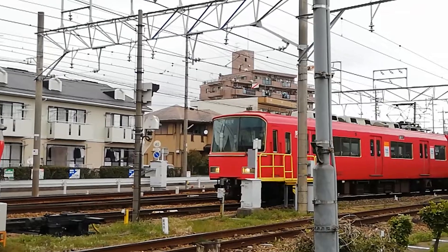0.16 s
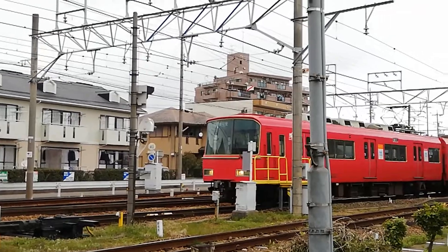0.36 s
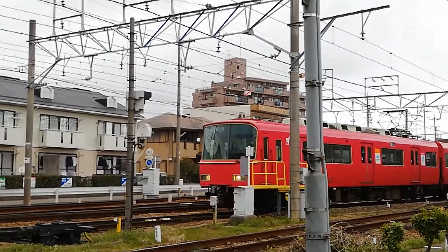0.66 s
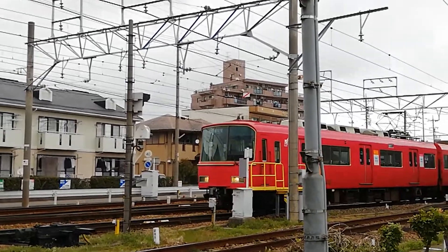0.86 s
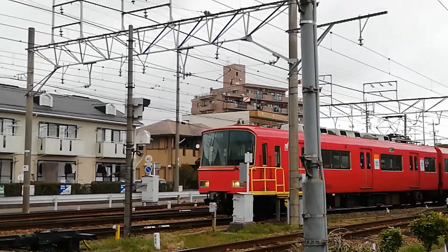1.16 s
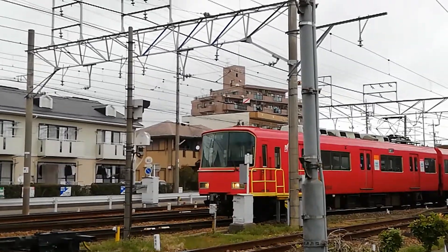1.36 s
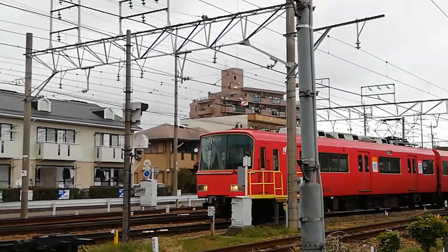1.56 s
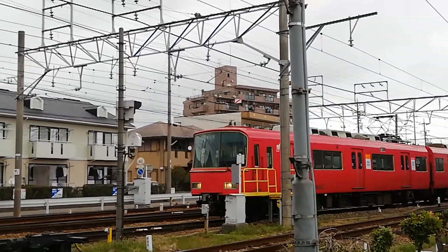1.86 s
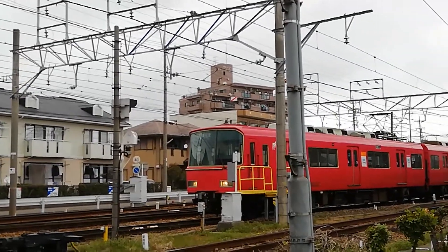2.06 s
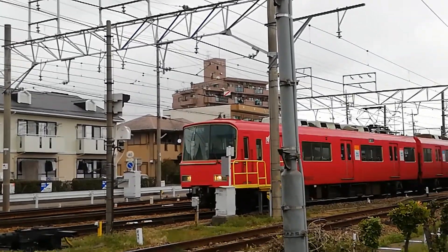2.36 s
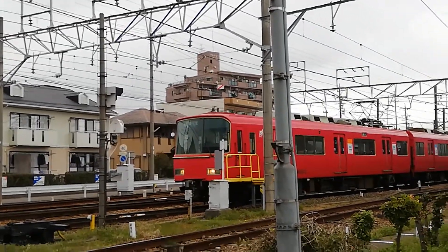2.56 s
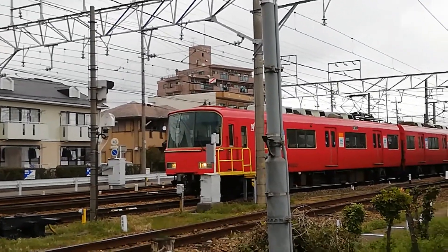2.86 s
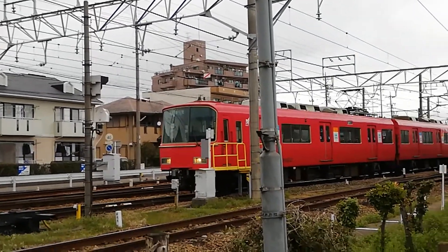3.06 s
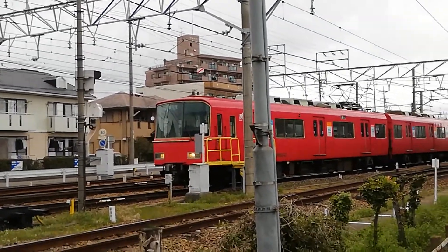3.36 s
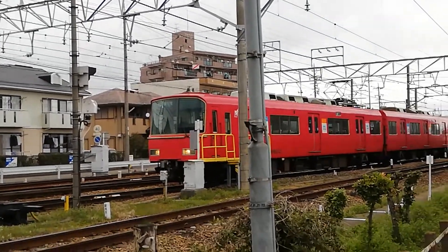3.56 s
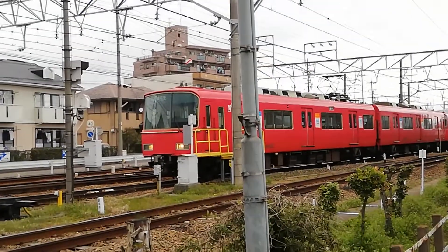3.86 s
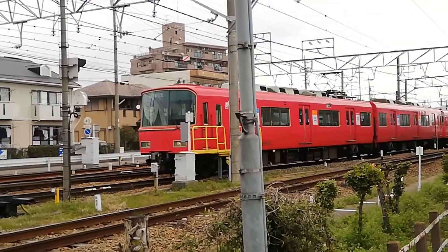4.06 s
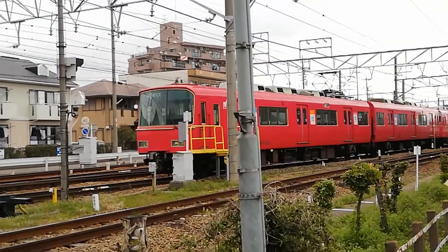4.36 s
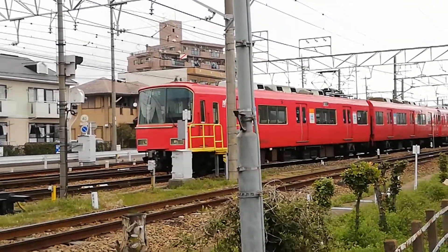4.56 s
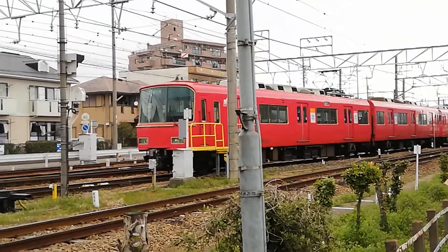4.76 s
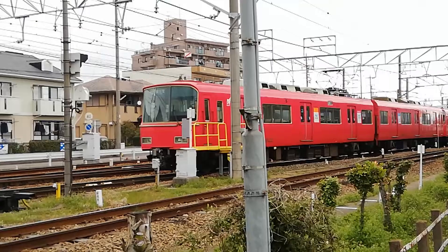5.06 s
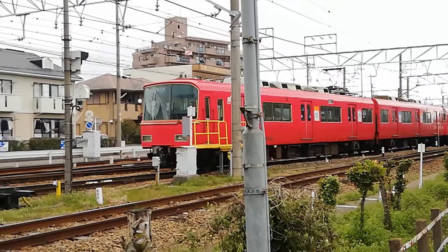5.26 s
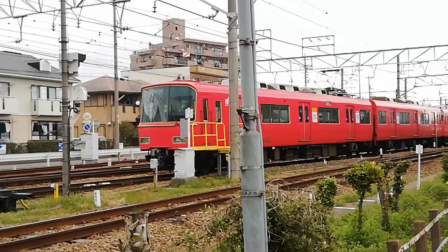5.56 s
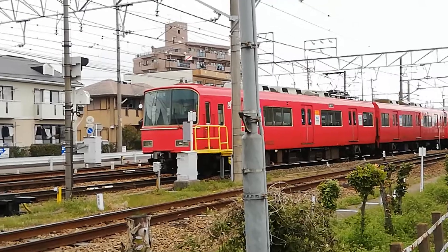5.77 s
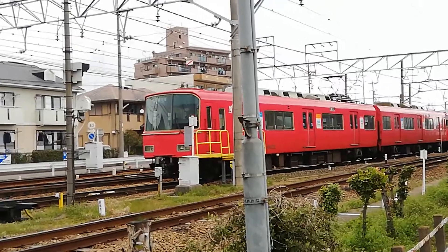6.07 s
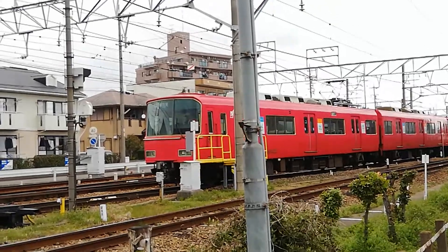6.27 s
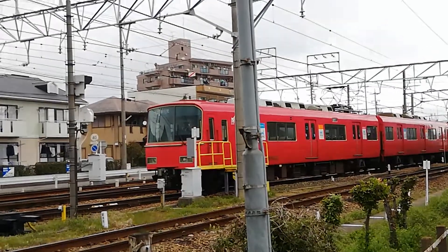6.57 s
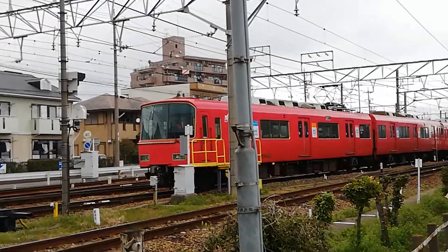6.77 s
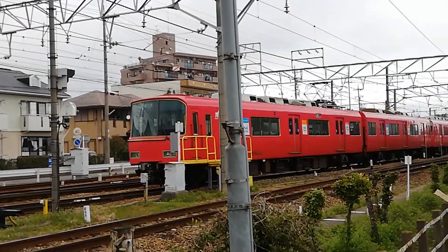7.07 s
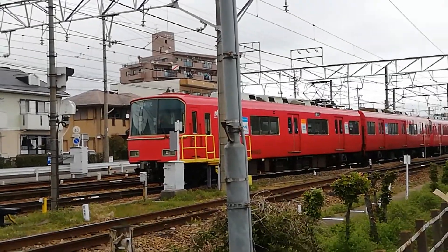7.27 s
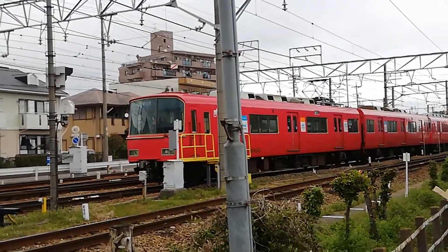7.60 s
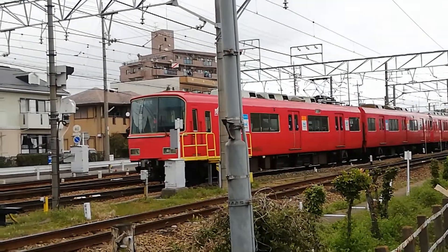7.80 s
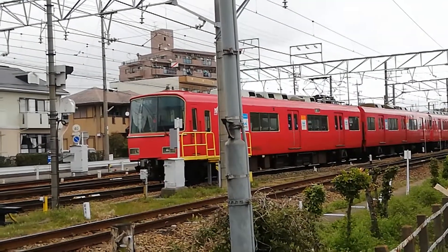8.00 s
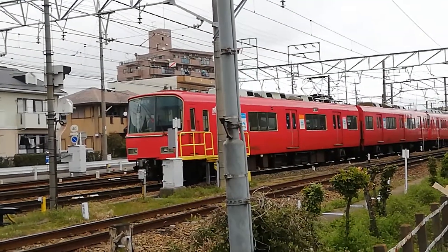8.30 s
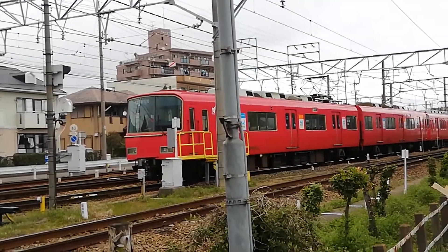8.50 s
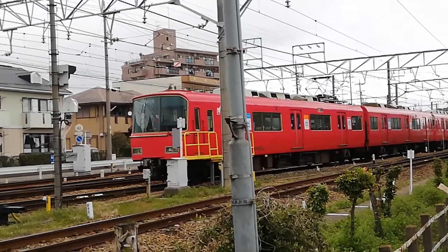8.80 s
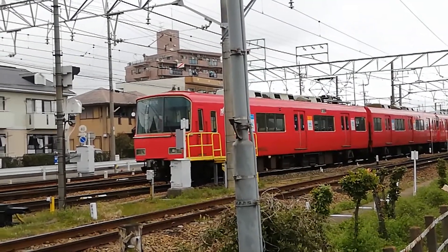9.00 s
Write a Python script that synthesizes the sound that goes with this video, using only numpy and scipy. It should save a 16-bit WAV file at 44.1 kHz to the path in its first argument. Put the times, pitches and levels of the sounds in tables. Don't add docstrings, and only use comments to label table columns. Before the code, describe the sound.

A braking electric train squeals and groans to a stop, releases a sharp rush of air, then its compressor chugs softly as gusts calm.

```python
import sys
import numpy as np
from scipy import signal
from scipy.fft import rfft, irfft, next_fast_len
from scipy.io import wavfile
from scipy.ndimage import uniform_filter1d

SR = 44100
rng = np.random.default_rng(int(sys.argv[2]) if len(sys.argv) > 2 else 0)


def wrap_up_sound(samples):
    columns = np.atleast_2d(samples).T
    tamed = np.clip(columns, -1, 1)
    steps = np.round(tamed * 32767).astype(np.int16)
    wavfile.write(sys.argv[1], SR, steps)


def field_ratio(decibels):
    return 10 ** (np.asarray(decibels, dtype=float) / 20)


N = 403192
T = np.arange(N) / SR
SIZE = next_fast_len(N)
HZ = np.fft.rfftfreq(SIZE, 1 / SR)
LOG_HZ = np.log(HZ + 1)


def evened(x):
    return x / np.sqrt(np.mean(x ** 2) + 1e-20)


def read(points):
    f, value = np.transpose(points)
    return np.interp(LOG_HZ, np.log(f + 1), value)


def curves(rows):
    s, *columns = np.transpose(rows)
    inside = (T >= s[0]) & (T <= s[-1])
    gate = uniform_filter1d(1. * inside, size=400)
    return gate, *(np.interp(T, s, c) for c in columns)


# (frequency [Hz], likeness [0-1])
PORT_LIKENESS = [(60, 1), (180, .88), (280, .88), (400, .72), (550, .55), (750, .69), (1200, .1),
                 (1700, .3), (3000, .3), (8000, .1)]
# (frequency [Hz], phase [rad])
PORT_LEAD = [(30, 0), (90, -.1), (170, -.42), (280, -.4), (390, -1.15), (500, -2.2), (750, -2.4),
             (2200, -8), (3000, -7.9), (4700, -9), (10000, -9)]


def noise(gain, same=PORT_LIKENESS, lead=PORT_LEAD):
    a, b, c, d = rng.standard_normal((4, len(HZ)))
    like = np.clip(read(same), 0, 1)
    left = a + 1j * b
    right = like * left * np.exp(-1j * read(lead)) + np.sqrt(1 - like ** 2) * (c + 1j * d)
    return evened(irfft(np.array([left, right]) * gain, SIZE)[:, :N])


def band(lo_hz, hi_hz):
    def above(hz):
        return 1 / (1 + (hz / (HZ + 1)) ** 6)
    return np.sqrt(above(lo_hz) * (1 - above(hi_hz)))


def peak(hz, width):
    return 1 / (1 + ((HZ - hz) / width) ** 2)


def flicker(top_hz):
    hz = HZ[:SIZE // 128 + 1]
    z = rfft(rng.standard_normal(2 * len(hz) - 2)) / np.sqrt(hz + 2) / (1 + (hz / top_hz) ** 4)
    slow = irfft(z * (hz > .3))
    return evened(np.interp(T, np.linspace(0, SIZE / SR, len(slow)), slow))


def swell(t, s, db, rise, hold, fall):
    before, after = np.maximum(s - t, 0), np.maximum(t - s - hold, 0)
    return field_ratio(db - 20 * before / rise - 20 * after / fall)


# (time [s], level [dB], valve puffs relative to it [dB])
HUM_LEVEL = [(0.0, -60.5, 5.5), (0.22, -62, 4.5), (0.36, -61.5, 3), (0.55, -61.5, 1.5), (0.8, -60.5, -0.5),
             (1.6, -61.5, -2), (3.3, -59.5, 0), (6, -61, 0), (9.14, -61.5, 1.5)]
# (frequency [Hz], level [dB per Hz])
HUM_COLOUR = [(88, -21.5), (150, -10), (244, -8.5), (359, -7.5), (428, -11), (827, -8), (1060, -11),
              (1320, -11), (1700, -14), (2810, -15.5), (3100, -19.5), (5760, -16.5), (7130, -24.5),
              (11600, -25.5), (12600, -33.5), (14400, -37), (15500, -41)]
# (frequency [Hz], width [Hz], level [dB])
FANS = [(833.4, 45.6, -4), (1298.6, 28, -5.5), (4386, 625, -1), (5614, 64, -7.5), (6020, 180, -10.5),
        (6597, 226, -10)]
# (frequency [Hz], level [dB])
MOTOR_TONES = [(89.4, 11.5), (219, -7), (277, -8), (361, -6), (2880, -12.5), (4265, -20.5), (5545, -18)]
# (place in the turn [0-1], puff level [dB], decay [s])
VALVES = [
    (.08, 4, .012),
    (.37, 8.5, .022),
    (.645, 10.5, .013),
    (.82, 5, .025),
]
# (frequency [Hz], level [dB per Hz])
PUFF_COLOUR = [(1500, -24), (3000, -10), (4400, -8), (5150, -9), (5800, 4.5), (7600, -12), (10500, -5),
               (11300, -4.5), (12500, -12), (15500, -29)]
TURNS_PER_S = 8.128
FAN_THROB_DB, FAN_THROB_PLACE = 1.6, .85


def machinery():
    _, level_db, puff_db = curves(HUM_LEVEL)
    hum = field_ratio(7.5 + 0.136 * flicker(top_hz=14.0)) * noise(field_ratio(read(HUM_COLOUR)) * band(130.0, 19900))

    fans = sum(field_ratio(db) * peak(hz, width) / np.sqrt(width / 40) for hz, width, db in FANS)
    throb_db = FAN_THROB_DB * np.cos(2 * np.pi * (T * TURNS_PER_S - FAN_THROB_PLACE))
    hum += field_ratio(1.9 + throb_db + 1.2 * flicker(top_hz=5.5)) * noise(fans)

    for hz, db in MOTOR_TONES:
        turn = 2 * np.pi * np.cumsum(hz + 1.3018 * flicker(top_hz=2.1)) / SR
        hum += field_ratio(db + 1.8 * flicker(top_hz=7)) * np.sin(turn)

    flow = np.zeros(N)
    for place, db, decay in VALVES:
        since = (T * TURNS_PER_S - place) % 1 / TURNS_PER_S
        flow += field_ratio(db) * (1 - np.exp(-since / 0.00413)) * np.exp(-since / decay)
    puffs = field_ratio(puff_db + 0.97 * flicker(top_hz=2.55)) * flow * noise(field_ratio(read(PUFF_COLOUR)))

    since = (T * TURNS_PER_S - .05) % 1 / TURNS_PER_S
    thump = field_ratio(5.5 + 2.4 * flicker(top_hz=6)) * np.exp(-since / 0.036) * np.sin(2 * np.pi * 90 * since)
    return field_ratio(level_db) * (hum + puffs + thump)


# time [s], length [s], frequency [Hz], width [Hz], level [dB]
CREAK = (4.6, .075, 3110, 120, -60)


def creak():
    s, length, hz, width, db = CREAK
    return field_ratio(db) * np.exp(-((T - s) / length) ** 2) * noise(peak(hz, width))


# (time [s], level [dB])
WIND_PRESSURE = [(0.0, -30.5), (0.1, -46.5), (0.25, -32), (0.86, -37.5), (1.14, -26.5), (1.35, -37),
                 (1.47, -25), (1.55, -37.5), (2.47, -40.5), (2.6, -49.5), (4.2, -45.5), (5.65, -53),
                 (5.9, -47), (6.01, -53.5), (6.49, -48.5), (8.76, -53), (8.88, -47), (9.14, -51.5)]
# (time of the peak [s], level [dB], time to fall 20 dB either side [s], sharp edge relative [dB])
GUSTS = [(.035, -25.5, 0.03, -30), (.125, -21, 0.1336, -15), (.24, -22, 0.1, -5), (.325, -26.5, 0.0545, -3),
         (.415, -24.5, 0.23, -20.5), (.475, -29.5, .11, 0), (.56, -27.5, 0.01, -13.5),
         (.63, -32.5, 0.22, -22.5), (0.691, -27.5, 0.28, -22), (0.816, -28.5, 0.0482, 10.5),
         (.89, -22.5, 0.07, -4), (1.06, -25, 0.0231, -6), (1.095, -25, 0.1, -19), (1.171, -23, 0.0951, -5),
         (1.27, -25, 0.1049, -10), (1.336, -22.5, 0.09, -24), (1.421, -21.5, 0.04, -13),
         (1.475, -26.5, 0.07, -10), (1.62, -31.5, 0.09, -15.5), (1.73, -32.5, 0.21, -8.5),
         (1.92, -31, 0.14, -8.5), (1.995, -24.5, 0.0881, -11), (2.095, -34.5, 0.07, -11),
         (2.27, -29.5, 0.0731, -16.5), (2.405, -27, 0.0932, -14), (4.06, -37.5, 0.1949, -24.5),
         (4.78, -47.5, 0.22, -32), (5.385, -43.5, 0.3, -19.5), (5.8, -48, 0.36, -20.5),
         (6.63, -44, 0.26, -21)]
LULL_DB, EDGE_LULL_DB = -3, -58.5
EDGE_NARROW = 0.617


def gusts():
    t = T[::64]
    body = field_ratio(np.interp(t, *np.transpose(WIND_PRESSURE)) + LULL_DB) ** 2
    edge = field_ratio(EDGE_LULL_DB) ** 2
    for s, db, width, edge_db in GUSTS:
        edge_width = EDGE_NARROW * width
        body = body + swell(t, s, db, width, 0, width) ** 2
        edge = edge + swell(t, s, db + edge_db, edge_width, 0, edge_width) ** 2
    return np.interp(T, t, np.sqrt(body)), np.interp(T, t, np.sqrt(edge))


def pushes(rows, trim_db, damping, lag):
    out = np.zeros((2, N))
    for s, db, hz, pan_db in rows:
        at = round(s * SR)
        u = np.maximum(T[:2400] - .002 + np.array([[0], [lag]]), 0) * hz / damping
        push = (u / 3) ** 3 * np.exp(3 - u) * np.cos(2 * np.pi * damping * u)
        out[:, at - 90:at + 2310] += field_ratio(db + trim_db + np.array([[.5], [-.5]]) * pan_db) * push
    return out


# (frequency [Hz], level [dB per Hz])
BODY_COLOUR = [(8.8, -39.5), (15, -14), (43, 2), (97, 0), (193, -8.5), (228, -11.5), (280, -17.5),
               (335, -22), (400, -20), (520, -43), (880, -120)]
# (frequency [Hz], level [dB per Hz])
EDGE_COLOUR = [(60, -11), (150, -15), (230, -1), (330, -8), (450, -15), (650, -30.5), (1000, -61.5)]
# (frequency [Hz], likeness [0-1])
WIND_LIKENESS = [(30, .99), (70, .94), (130, .7), (200, .55), (300, .8), (500, .9), (800, .6)]
# (frequency [Hz], phase [rad])
WIND_LEAD = [(30, -.03), (90, -.12), (170, -.7), (260, -1.5), (350, -2.2), (500, -2.8), (800, -3.1)]
# (time [s], peak level [dB], pitch [Hz], left over right [dB])
SLAPS = [(0.04, -31, 198.7, 3), (0.113, -20.5, 200, -2), (0.21, -26.5, 199.5, -8), (0.225, -25, 282, -9.5),
         (0.298, -27.5, 235, -4), (0.447, -20, 199.3, -1.5), (0.482, -18, 227.3, -6),
         (0.632, -27.5, 225, -1.5), (0.785, -21, 197, -1.5), (0.809, -13.5, 300, -2.5),
         (0.905, -24.5, 255, 0.5), (1.053, -24.5, 266.6, 1), (1.164, -22.5, 204.4, -6.5),
         (1.296, -26, 205.2, 0), (1.417, -24.5, 244, 0), (1.463, -28, 201.5, -7), (1.864, -26, 254.6, 0.5),
         (1.981, -24.5, 333, -3.5), (2.088, -26, 206, -5.5), (2.209, -32, 199, 6),
         (2.384, -40, 201.7, -2.5), (5.377, -39, 201.5, -5), (5.79, -55, 202.3, 1),
         (6.628, -55.5, 201.9, -1.5)]
# (time [s], peak level [dB], pitch [Hz], left over right [dB])
THUMPS = [(0.11, -21.0, 141.3, -1.5), (0.138, -20, 107.0, 0.6), (0.207, -18, 126, -1.77),
          (0.221, -21.0, 116.0, -2.5), (0.252, -14.5, 106.0, -0.5), (0.317, -20.5, 101.0, -0.5),
          (0.407, -22, 98, -3.5), (0.456, -19, 122.2, 2.0), (0.481, -19.5, 123.0, 1.1),
          (0.497, -22.5, 109.2, -1), (0.52, -20, 123.3, -1.0), (0.63, -18.5, 125.5, 0.1),
          (0.712, -23.5, 117, 0.74), (0.784, -20, 127.5, -1.37), (0.813, -21.5, 114.7, 0.55),
          (0.857, -24.5, 102.0, -1.5), (0.905, -20, 106.0, 1.88), (1.05, -20.0, 119.2, -3.5),
          (1.09, -16, 85.9, 0.07), (1.144, -18.0, 101.7, 0.5), (1.177, -17.5, 103.8, -0.9),
          (1.217, -21, 102.0, -6), (1.337, -18, 109.4, -0.48), (1.439, -19, 92, 3),
          (1.466, -22.5, 100.6, -5), (1.516, -25.5, 105.0, 1.17), (1.585, -26.5, 109.0, 0.7),
          (1.618, -29, 110.0, -0.62), (1.656, -27.0, 113.0, -0.5), (1.689, -28.5, 102.0, -3.5),
          (1.714, -29.0, 128.0, 2.34), (1.747, -30, 116.0, 2), (1.857, -29.5, 105.7, -0.17),
          (1.916, -27, 99.3, 1.5), (1.95, -23, 100.0, -0.72), (1.969, -21, 114.0, -0.5),
          (2.005, -19.5, 111.0, -1.73), (2.091, -24, 117.5, -2.5), (2.234, -29, 101.4, 0.2),
          (2.268, -23, 108.3, 1.6), (2.287, -29, 89.0, 1), (2.397, -24.5, 97.7, -1.82),
          (2.448, -29.0, 92.0, -0.5), (2.473, -32.0, 84.0, 0.2), (4.809, -33.5, 103.0, -1.6),
          (5.378, -30, 130, -1.3), (5.797, -33.5, 121.2, 2.48), (6.625, -30, 109.0, -1.1),
          (6.653, -37, 109.4, 0), (7.74, -38, 85.0, 0.87)]


def wind():
    slow_db = curves(WIND_PRESSURE)[1]
    body, edge = gusts()
    smooth_db = uniform_filter1d(20 * np.log10(body), size=8000)
    strength = np.clip((smooth_db + 56.5) / 18, .15, 1)
    flutter = strength * flicker(top_hz=46.95)
    colour = field_ratio(read(BODY_COLOUR))

    body_gain = body * field_ratio(-5.5 + 5.47 * (1 - strength) + 2.8 * flutter)
    out = body_gain * noise(colour * band(91.2, 216.7), WIND_LIKENESS, WIND_LEAD)

    surge = (body / uniform_filter1d(body, size=12000)) ** 0.415
    rumble_gain = surge * field_ratio(slow_db + 1.01 + 0.9235 * flicker(top_hz=5.1))
    out += rumble_gain * noise(colour * band(8.5, 65.2), WIND_LIKENESS, WIND_LEAD)

    out += edge * field_ratio(2.5 * flutter - 1.0) * noise(field_ratio(read(EDGE_COLOUR)), WIND_LIKENESS, WIND_LEAD)
    slaps = pushes(SLAPS, trim_db=2.0, damping=0.239, lag=0.000822)
    thumps = pushes(THUMPS, trim_db=0.69, damping=0.2415, lag=0.000646)
    return out + slaps + thumps


# (frequency [Hz], likeness [0-1])
JET_LIKENESS = [(500, 0.54), (800, 0.19), (1500, 0.964), (2300, 0.113), (3300, 0.346), (5000, 0.27),
                (9500, 0.28), (15000, 0.286)]
# (frequency [Hz], phase [rad])
JET_LEAD = [(0, 2), (520, 0.5), (1640, -1.16), (3620, -4.5), (4390, -8), (5430, -7.5), (9470, -4),
            (10700, -7.5), (13700, -9.5), (15200, 7)]
# (time [s], peak level [dB], rise [s], fall [s], centre frequency [Hz])
SPITS = [
    (.772, -42, .0038, .011, 9700),
    (.79, -54, .01, .025, 10200),
    (.814, -54, .003, .012, 12800),
    (.838, -48, .004, .009, 10250),
    (.94, -56, .02, .0375, 10650),
    (1.062, -56, .005, .007, 10700),
    (3.095, -51, .025, .03, 11500),
    (3.135, -51, .033, .005, 10400),
]


def valve_spits():
    out = np.zeros((2, N))
    air = noise(band(5025, 15000), JET_LIKENESS, JET_LEAD)
    for s, db, rise, fall, hz in SPITS:
        at, u = round(s * SR), T[:8000]
        flow = np.minimum(u / rise, 1) * np.exp(-np.maximum(u - rise, 0) / fall)
        nozzle = signal.butter(2, [hz * 0.871, hz * 1.1], "band", fs=SR)
        out[:, at:at + 8000] += field_ratio(db + 6.5) * flow * signal.lfilter(*nozzle, air[:, at:at + 8000])
    return out


# (time [s], level [dB])
RELEASE = [
    (1.66, -82),
    (1.672, -48),
    (1.69, -25),
    (1.76, -21.5),
    (1.94, -23.5),
    (2.13, -30),
    (2.25, -39),
    (2.46, -45.5),
    (3.1, -74),
]
# (frequency [Hz], level [dB per Hz])
JET_COLOUR = [(260, -62), (450, -46), (661, -23), (851, -13.5), (1230, -7.5), (1410, -7), (1840, -6),
              (3690, -4.5), (4960, -10.5), (6100, -9), (7730, -9.5), (9300, -4), (10300, -2.5),
              (11900, -8.5), (14000, -21.5), (14600, -27), (15500, -42)]
# (low edge [Hz], high edge [Hz], level at full flow [dB], gained [dB], sag to gain most of it [dB])
JET_PARTS = [
    (4650, 6500, -7.5, 11.5, 6.5),
    (1920, 5280, -6.8, 21, 28),
    (300, 2340, -14.5, 27, 22),
]
FULL_S, OPENING = 1.76, .2


def brake_air():
    gate, flow_db = curves(RELEASE)
    sag_db = (flow_db.max() - flow_db) * np.where(T > FULL_S, 1, OPENING)
    colour = field_ratio(read(JET_COLOUR))
    eddies = field_ratio(1.35 * evened(uniform_filter1d(rng.standard_normal(N), size=12)))

    sizzle = noise(colour * band(9760, 19930), JET_LIKENESS, JET_LEAD)
    jet = field_ratio(0.76 * flicker(top_hz=20.6)) * sizzle
    for lo_hz, hi_hz, full_db, gain_db, sag_scale_db in JET_PARTS:
        gained_db = gain_db * (1 - np.exp(-sag_db / sag_scale_db))
        share_db = full_db + gained_db + 0.77 * flicker(top_hz=15.7)
        jet += field_ratio(share_db) * noise(colour * band(lo_hz, hi_hz), JET_LIKENESS, JET_LEAD)
    hiss = gate * field_ratio(flow_db + 1.2232) * eddies * jet
    return irfft(rfft(hiss, SIZE) * band(289, 21300), SIZE)[:, :N]


# (time [s], length [s], left level [dB], right level [dB], left leads by [rad])
GRABS = [(-.02, .05, -56, -52.5, -.5), (.042, .052, -50, -55.5, -.5), (.1, .056, -53, -50, -.5),
         (.18, .04, -57, -50, -.5), (.213, .055, -58, -44, -.7), (.272, .062, -54, -48, -.7),
         (.352, .03, -45, -43, -.4), (.384, .052, -49, -40, 0), (.448, .024, -40, -53, -1),
         (.482, .028, -43, -49, -2.1), (.51, .028, -49, -48, -1.7), (.552, .036, -47, -48.5, -.2),
         (.599, .028, -52, -45, -.7), (.63, .03, -58, -52, 1.8), (.658, .018, -49, -50, -3.1),
         (.675, .014, -44, -53, -1.1), (.704, .024, -55, -63, -1.5)]
SQUEAL_HZ, CLIMB_FROM_S, CLIMB_HZ_PER_S = 3895, .29, 245
# (frequency [Hz], level [dB per Hz])
SCRAPE_COLOUR = [(900, -15), (1700, -4), (2300, -1), (2700, 2), (3150, 2), (3600, .5), (4500, -9),
                 (6000, -12.5), (8000, -17.5)]
# time reached [s], level [dB], rise [s per 20 dB], hold [s], fall [s per 20 dB]
SCRAPE_SWELL = (.67, -51.5, .2, .32, .2)
SCRAPE_START_HZ, SCRAPE_SINK_HZ_PER_S = 100, 400
# (frequency [Hz], width [Hz], clean tone [dB])
WHEEL_MODES = [(3100, 230, -12), (2900, 50, 0), (2420, 110, -20), (1540, 90, -10), (1500, 35, 3),
               (934, 40, -2)]
# (time reached [s], level [dB], rise [s per 20 dB], hold [s], fall [s per 20 dB])
MODE_SWELLS = [
    (.74, -52.5, .18, .09, .16),
    (.78, -55.5, .1, .225, .05),
    (.7, -60, .15, .33, .08),
    (.8, -59.5, .12, .11, .12),
    (.95, -60, .04, .155, .1),
    (1.06, -63, .2, .07, .15),
]


def brake_block():
    n = 2 * SR
    t, out = T[:n], np.zeros((2, N))

    hz = SQUEAL_HZ + CLIMB_HZ_PER_S * np.maximum(t - CLIMB_FROM_S, 0) + 8.5 * flicker(top_hz=70)[:n]
    turn = 2 * np.pi * np.cumsum(hz) / SR
    squeal = np.zeros((2, n))
    for s, length, left_db, right_db, lead in GRABS:
        off_centre = abs(2 * (t[:SR] - s) / length - 1)
        grip = np.sin(np.pi / 2 * np.clip(1.4 * (1.2 - off_centre), 0, 1))
        tone = np.sin(turn[:SR] + np.array([[lead], [0]]))
        squeal[:, :SR] += field_ratio([[left_db], [right_db]]) * grip * tone
    squeal *= field_ratio(2.8 + .9 * flicker(top_hz=40)[:n])

    shift_hz = SCRAPE_START_HZ - SCRAPE_SINK_HZ_PER_S * (t - SCRAPE_SWELL[0])
    scrape = signal.hilbert(noise(field_ratio(read(SCRAPE_COLOUR)))[:, :n])
    scrape = scrape * np.exp(2j * np.pi * np.cumsum(shift_hz) / SR)
    grind = swell(t, *SCRAPE_SWELL) * field_ratio(1.8 * flicker(top_hz=120)[:n]) * scrape.real

    rubbing = noise(band(500, 5000))[:, :n]
    for (hz, width, tone_db), ring in zip(WHEEL_MODES, MODE_SWELLS):
        resonance = signal.butter(2, [hz - width, hz + width], "band", fs=SR, output="sos")
        mode = evened(signal.sosfilt(resonance, rubbing))
        tone = np.sin(2 * np.pi * np.cumsum(hz + .4 * width * flicker(top_hz=50)[:n]) / SR)
        grind += swell(t, *ring) * field_ratio(1.4 * flicker(top_hz=40)[:n]) * (mode + field_ratio(tone_db) * tone)
    out[:, :n] = squeal + grind
    return out


def scene():
    return machinery() + creak() + wind() + valve_spits() + brake_air() + brake_block()


def low_pass(x):
    return signal.sosfilt(signal.butter(12, 15710, fs=SR, output="sos"), x)


# (frequency [Hz], left over right [dB])
PORT_BALANCE = [(200, 0), (500, -2), (900, -5), (1600, -1), (2100, -5), (2900, -7), (4200, -4.5),
                (5000, -2), (7000, -3), (8500, 2.5), (10500, 6.5), (11500, -8), (12500, -5.5), (14500, -7)]
# (frequency [Hz], how far they sink below their neighbours in frequency [exponent])
SINK = [(300, 0), (2000, 0.225), (5000, 0.067), (7500, 0.46), (10000, 0), (12500, 0.38), (15000, .8)]
# (frequency [Hz], share lost [0-1])
LOST = [(7000, 0), (7500, .04), (8200, 0), (12000, 0), (13200, .3), (15000, .35), (15500, .6)]
# (time [s], frequency [Hz])
BAND_TOP = [(.75, 15000), (.77, 15800), (.8, 15800), (.82, 14900), (1.65, 14800), (1.67, 15800),
            (1.7, 15800), (1.715, 14500), (1.735, 14500), (1.74, 15600), (1.77, 15600), (1.785, 14400),
            (1.97, 14500), (2.09, 13900), (2.12, 13100), (2.17, 14300), (2.3, 13900), (2.64, 13500),
            (2.95, 15800)]
RAGGED_HZ, RAGGED_SHARE = 2300, .7


def record(dry):
    hz, t, z = signal.stft(dry, SR, nperseg=2048, noverlap=1024, boundary="odd")

    def on_bins(points):
        return np.interp(hz, HZ, read(points))[:, None]

    def nearby(v):
        return uniform_filter1d(v, size=16, axis=1)

    chance = rng.standard_normal((len(t), len(hz), 2)).T
    patches = evened(uniform_filter1d(uniform_filter1d(chance[0], size=20, axis=0), size=4, axis=1))
    balance_db = np.array([[[.5]], [[-.5]]]) * on_bins(PORT_BALANCE)
    z = z * field_ratio(1.0177 * patches * (hz[:, None] > 500) + balance_db)

    size = abs(z) + 1e-12
    sunk = z * (size / nearby(size)) ** np.clip(on_bins(SINK), 0, 2)
    sunk *= np.sqrt(nearby(size ** 2) / nearby(abs(sunk) ** 2 + 1e-24))

    lottery = np.repeat(rng.random((len(t), 65)), 16, axis=1).T[:len(hz)]
    top_hz = np.interp(t, *np.transpose(BAND_TOP))
    kept = (hz[:, None] < top_hz) & ((lottery > on_bins(LOST)) | (abs(t - 2.15) < .5))

    depth = np.clip(1 - (top_hz - hz[:, None]) / RAGGED_HZ, 0, 1)
    ragged = RAGGED_SHARE * depth * (abs(t - 2.2) < .5)
    lines = np.repeat(np.repeat(rng.random((257, len(t) // 2 + 1)), 4, axis=0), 2, axis=1)
    kept = kept & (lines[:len(hz), :len(t)] > ragged)

    x = signal.istft(sunk * kept, SR, nperseg=2048, noverlap=1024)[1][:, :N]
    mix = x * np.minimum(T / .008, 1)
    return low_pass(mix)


dry = scene()
out = record(dry)
wrap_up_sound(out)
```